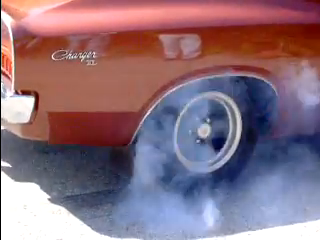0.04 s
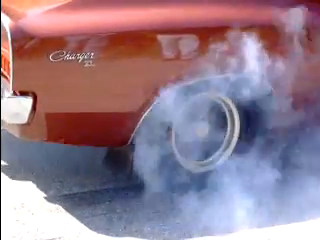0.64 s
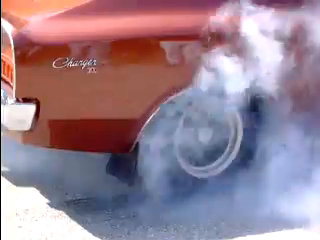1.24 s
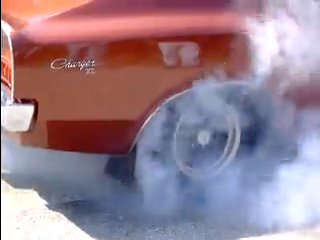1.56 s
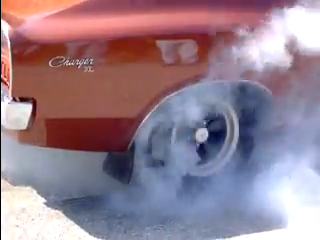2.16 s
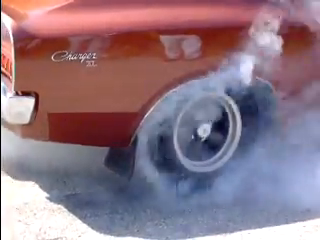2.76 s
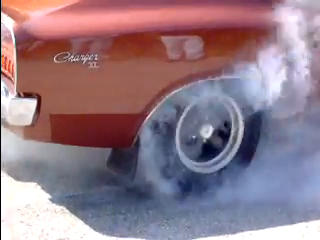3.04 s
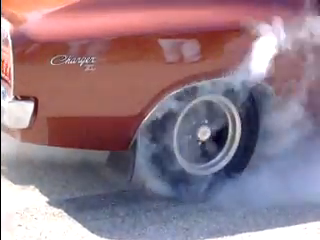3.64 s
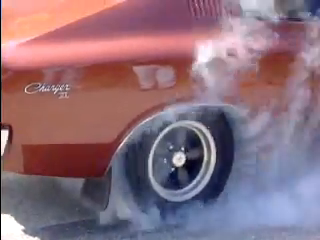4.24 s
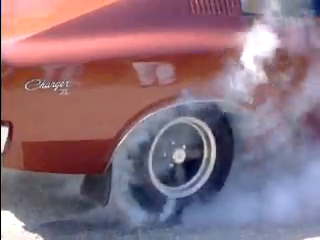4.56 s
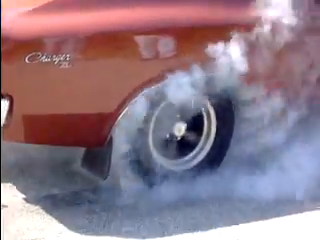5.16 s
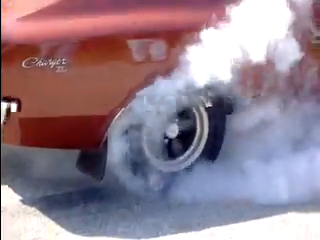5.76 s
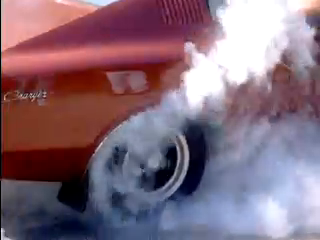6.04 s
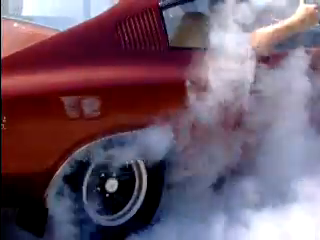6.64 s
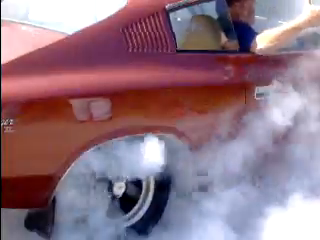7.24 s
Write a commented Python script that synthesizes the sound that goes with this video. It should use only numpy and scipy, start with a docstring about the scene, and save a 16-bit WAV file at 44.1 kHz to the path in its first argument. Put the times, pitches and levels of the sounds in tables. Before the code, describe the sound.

A car engine drones at high revs while a spinning rear tyre squeals, then howls and hisses on asphalt, close and slightly distorted.

```python
"""A six-cylinder car in a standing burnout on asphalt, the microphone beside the spinning rear wheel.
The exhaust drones and rasps at about 3200 rpm. The tyre squeals as it bites in the first second,
and howls and hisses as it slides. A few puffs of wind reach the microphone; late on it moves forward
and picks up the hiss ringing in the wheel arch. This close, the squeal overloads the small,
narrow-band recorder, which breaks into crackle."""
import sys
import numpy as np
from scipy import signal
from scipy.fft import rfft, irfft
from scipy.io import wavfile

SR = 44100
rng = np.random.default_rng(int(sys.argv[2]) if len(sys.argv) > 2 else 0)


def wrap_up_sound(samples):
    """Save the sound to the file named by the first command line argument, as 16-bit audio."""
    columns = np.atleast_2d(samples).T
    # keep every value between -1 and 1, then stretch to whole-number steps
    tamed = np.clip(columns, -1, 1)
    steps = np.round(tamed * 32767).astype(np.int16)
    wavfile.write(sys.argv[1], SR, steps)


N = 322371

# Engine speed. Each row: time in seconds, firings per second.
FIRING_RATE = [(0.0, 166.3), (0.16, 160.9), (0.38, 149.7), (0.9, 146.0), (1.16, 163.1), (1.26, 166.6),
               (1.65, 178.9), (1.9, 171.5), (2.33, 165.0), (2.6, 163.8), (2.9, 159.9), (3.6, 157.9),
               (4.2, 158.3), (5.36, 161.0), (5.56, 161.2), (6.2, 162.9), (7.31, 161.3)]
# Exhaust standing waves, which the firing harmonics glide through. Each row: frequency in Hz, level in dB.
STANDING_WAVES = [(146, -13), (157, -11.5), (165, -14), (178, -17.5), (292, -33.5), (320, -29), (337, -36),
                  (356, -23), (440, -37), (476, -24), (495, -27.5), (521, -34), (535, -28), (592, -29),
                  (615, -38), (690, -33)]
# Lope of uneven cylinders. Each row: multiple of the four-stroke cycle rate, relative level in dB.
LOPE_TONES = [(2, -20.5), (3, -20), (4, -16), (5, -2), (7, -20.5), (8, -20), (9, 0), (10, -15), (11, -17),
              (13, -11.5), (15, -18.5)]
# Cylinders in firing order. Each row: relative strength in dB, delay in seconds from unequal manifold runs.
CYLINDER_PULSES = [(-1, -.0009), (3.5, .00066), (-1.5, .00061), (-2, -.00046), (1.3, .00064),
                   (-2.2, -.00053)]
# Exhaust pipe resonances. Each row: frequency in Hz, width in Hz, relative level in dB.
PIPE_MODES = [(585, 60, -3), (733.3, 45, -0.5), (819.5, 43, 1), (1105, 230, -20), (1306, 120, -21)]
# Centre of the tyre's howl, sinking as the rubber heats. Each row: time in seconds, pitch in Hz.
HOWL_CENTRE = [(0.0, 915.2), (0.84, 903.1), (1.02, 819.2), (1.42, 830.8), (1.84, 790.4), (3.08, 807.3),
               (4.12, 753.5), (5.62, 779.6), (7.31, 807.9)]
# The tread catches and the howl surges. Each row: time in seconds, rise in dB.
HOWL_SURGES = [(.49, 3), (1.81, 3), (1.96, 4.5), (2.14, 3.5), (2.47, 4), (2.68, 5)]
# Rubber and road noise. Each row: frequency in Hz, relative spectral level in dB.
HISS_SPECTRUM = [(400, -3.5), (600, 7), (900, 13.5), (1400, 7.5), (2000, 1.5), (2700, -1), (4000, -9),
                 (5200, -15), (6800, -15.5)]
# Low rumble of the exhaust flow. Each row: frequency in Hz, relative spectral level in dB.
RUMBLE_SPECTRUM = [(22, -4.5), (55, -3), (90, -2), (140, 2), (250, -2), (340, 4), (420, -12), (600, 0)]
# Stick-slip squeals. Each row: start in seconds, length in seconds, pitch in Hz, level in dB.
TYRE_SQUEALS = [(0.059, 0.014, 970, -14), (.143, .088, 911.3, -2.8), (.252, .136, 906, -3.3),
                (.725, .055, 920, -18)]
# Lone sharp snaps. Each row: time in seconds, height in dB.
SNAPS = [(1.116, -4), (1.153, -3.5), (1.3344, -3.5), (1.6338, -4), (4.0605, -2.5), (4.4898, -4)]
# Wind on the microphone. Each row: time of the peak in seconds, half-length in seconds, level in dB.
WIND_PUFFS = [(2.779, .1, -36), (3.1, 0.029, -30.5), (3.2, 0.027, -30.5), (4.278, .03, -42),
              (4.62, .12, -48.5)]
# The drone from further forward. Each entry: change in dB of one of the first four firing harmonics.
MOVED_HARMONIC_DB = [-0.1, 4.2, -4, 0]

TUNED_HZ = 160.6   # firing rate at which the exhaust sounds fullest
# Levels that follow the revs. Each holds: dB at the tuned rate, dB gained per Hz above it,
# dB gained per Hz below it, dB lost once the microphone has moved.
HOWL_LEVEL = (-21.5, .25, -.04, 3)
HISS_LEVEL = (-27, .22, .06, .9)
RUMBLE_LEVEL = (-32.7, .14, .2, 3)
MOVE_START_S, MOVE_LENGTH_S = 5.23, 1   # the microphone moves forward along the car


def from_db(db):
    """Decibels to gain."""
    return 10 ** (np.asarray(db) / 20)


def rms_one(x):
    """Scale to unit rms."""
    return x / np.sqrt(np.mean(x ** 2) + 1e-20)


def in_time(rows):
    """A curve of (seconds, value) points at every sample."""
    return np.interp(np.arange(N) / SR, *np.transpose(rows))


def drift(rate):
    """Smooth random wander of spread 1."""
    r = np.exp(-80 * np.pi * rate / SR)
    slow = signal.lfilter([1], [1, -2 * r, r * r], rng.standard_normal(N // 40 + 2002))[2000:]
    return np.interp(np.arange(N) / 40, np.arange(len(slow)), rms_one(slow))


def band(x, low_hz, high_hz):
    """Butterworth band-pass."""
    return signal.sosfilt(signal.butter(2, [low_hz, high_hz], "band", fs=SR, output="sos"), x)


def resonance(x, hz, width_hz):
    """Two-pole resonance with gain 1 on top."""
    r = np.exp(-np.pi * width_hz / SR)
    feedback = [1, -2 * r * np.cos(2 * np.pi * hz / SR), r * r]
    return signal.lfilter(np.array([1, 0, -1]) * (1 - r * r) / 2, feedback, x)


def coloured_noise(spectrum):
    """Unit-rms noise with the given spectrum, falling away beyond its ends."""
    hz = np.maximum(np.arange(N // 2 + 1) * SR / N, 1)
    points_hz, points_db = np.transpose(spectrum)
    skirts = np.minimum(hz / points_hz[0], 1) ** 2 * np.minimum(points_hz[-1] / hz, 1) ** 2
    gain = skirts * from_db(np.interp(np.log(hz), np.log(points_hz), points_db))
    return rms_one(irfft(rfft(rng.standard_normal(N)) * gain, N))


def turning(hz):
    """Running angle of something that repeats hz times a second."""
    return 2 * np.pi * np.cumsum(hz) / SR


def tone(angle):
    """Unit-rms sine with a random starting phase."""
    return np.sqrt(2) * np.sin(angle + rng.uniform(0, 2 * np.pi))


def hump(s, half_length_s):
    """Smooth swell of height 1 around a moment."""
    return np.exp(-((np.arange(N) / SR - s) / half_length_s) ** 2)


def mic_moved():
    """How far the microphone has moved forward, 0 to 1."""
    return np.clip((np.arange(N) / SR - MOVE_START_S) / MOVE_LENGTH_S, 0, 1)


def with_revs(firing_hz, law):
    """Level in dB that changes as the engine races or bogs, and drops as the microphone moves on."""
    db, racing, bogging, moved_db = law
    above_hz = firing_hz - TUNED_HZ
    return db + np.where(above_hz > 0, racing, bogging) * np.abs(above_hz) - moved_db * mic_moved()


def exhaust_drone(firing, firing_hz, waver_db, lope_db, loss_db_per_hz):
    """Clean low firing harmonics; unequal cylinders add lope tones, strongest at the tuned rate."""
    harmonics = 0
    for k, moved_db in enumerate(MOVED_HARMONIC_DB, 1):
        level_db = np.interp(k * firing_hz, *np.transpose(STANDING_WAVES)) + moved_db * mic_moved()
        harmonics += from_db(level_db + waver_db * k * drift(12)) * tone(k * firing)
    cycle = firing / len(CYLINDER_PULSES)
    lope = sum(from_db(db + 1.1 * drift(8)) * tone(k * cycle) for k, db in LOPE_TONES)
    return harmonics + from_db(lope_db - loss_db_per_hz * np.abs(firing_hz - TUNED_HZ)) * lope


def pipe_rasp(firing, firing_hz, level_db, loss_db_per_hz, scatter_db, jitter_s):
    """Each firing sends a sharp pulse down the pipe and sets it ringing, loudest at the tuned rate."""
    fired_at = np.flatnonzero(np.diff(firing // (2 * np.pi)))
    strength_db, delay_s = np.resize(CYLINDER_PULSES, (len(fired_at), 2)).T
    jitter, scatter = rng.standard_normal((len(fired_at), 2)).T
    late = np.round((delay_s + jitter_s * jitter) * SR).astype(int)
    pulses = np.zeros(N)
    pulses[np.clip(fired_at + late, 0, N - 1)] = from_db(strength_db + scatter_db * scatter)
    pipe = sum((-1) ** k * from_db(db) * resonance(pulses, hz, width)
               for k, (hz, width, db) in enumerate(PIPE_MODES))
    gain = from_db(level_db - loss_db_per_hz * np.abs(firing_hz - TUNED_HZ))
    return gain * rms_one(band(pipe, 480, 1800))


def tyre_howl(firing, firing_hz, width_hz, swing_hz, firings_per_turn):
    """Hot tread slips in a ragged howl whose pitch swings with each turn of the wheel."""
    wheel = firing / firings_per_turn
    slip = turning(in_time(HOWL_CENTRE) + swing_hz * np.sin(wheel))
    # many tread blocks slip out of step, so strength and phase wander
    howl = rms_one(drift(width_hz) * np.cos(slip) + drift(width_hz) * np.sin(slip))
    surge_db = sum(db * hump(s, half_length_s=.04) for s, db in HOWL_SURGES)
    return howl * from_db(with_revs(firing_hz, HOWL_LEVEL) + surge_db)


def engine_chuff(firing):
    """Swing in dB of the hiss: it pulses with each firing and each engine cycle, and flutters."""
    return 1.08 * np.cos(firing) + .71 * np.cos(firing / len(CYLINDER_PULSES)) + .6 * drift(90)


def tyre_hiss(firing_hz, chuff_db):
    """Rubber scrubs over asphalt next to the microphone, pulsing with the engine."""
    return coloured_noise(HISS_SPECTRUM) * from_db(with_revs(firing_hz, HISS_LEVEL) + chuff_db)


def exhaust_rumble(firing_hz):
    """Turbulent exhaust flow, louder on either side of the tuned rate."""
    return coloured_noise(RUMBLE_SPECTRUM) * from_db(with_revs(firing_hz, RUMBLE_LEVEL))


def tyre_squeal(attack_s, release_s, sag_hz, wobble_hz, flutter_db):
    """Where the rubber grips, the whole tread sticks and slips in step; firmer grip lowers the pitch."""
    t, out = np.arange(N) / SR, 0
    for start, length, hz, db in TYRE_SQUEALS:
        before_s, after_s = np.maximum(start - t, 0), np.maximum(t - start - length, 0)
        grip = np.exp(-before_s / attack_s - after_s / release_s)
        pitch_hz = hz + sag_hz * (1 - grip) + wobble_hz * drift(60)
        out += grip * from_db(db + flutter_db * drift(70)) * tone(turning(pitch_hz))
    return out


def overload(x, limit, chance, burst_s, kept, crackle, ceiling):
    """The recorder flattens peaks; some crests that pass the limit break into a brief crackle."""
    crests = np.diff((np.abs(x) > limit) * 1., prepend=0) > 0
    breaks = crests & (rng.random(N) < chance)
    broken = signal.lfilter(np.ones(round(burst_s * SR)), [1], breaks * 1.) > 0
    noise = coloured_noise([(30, 9.5), (600, -3.5), (1600, 2.5), (3000, 2.5), (5000, -8.5), (6800, -3)])
    x = np.where(broken, kept * x + crackle * noise, x)
    return x / (1 + (x / ceiling) ** 8) ** (1 / 8)


def snaps(x, width_s, ring_hz, ring_s, ring_db):
    """At each snap the signal drops out for a millisecond and makes one steep, ringing jump."""
    out, t = x.copy(), np.arange(N) / SR
    for s, db in SNAPS:
        near = np.abs(t - s) < .005
        since = t[near] - s
        edge = np.sign(since) * np.exp(-np.abs(since) / width_s)
        ring = np.sin(2 * np.pi * ring_hz * since) * np.exp(-np.abs(since) / ring_s)
        out[:, near] *= 1 - np.exp(-(since / (2 * ring_s)) ** 2)
        out[:, near] += from_db(db) * (edge + from_db(ring_db) * ring)
    return out


def wind_on_mic():
    """Puffs of wind strike the microphone as short, deep thumps."""
    gusts = sum(from_db(db) * hump(s, half_length) for s, half_length, db in WIND_PUFFS)
    return gusts * rms_one(band(rng.standard_normal(N), 25, 75))


def wheel_arch(chuff_db, hz, width_hz, level_db):
    """The hiss rings in the wheel arch, heard as the microphone moves forward."""
    ringing = resonance(coloured_noise(HISS_SPECTRUM), hz, width_hz)
    ringing = resonance(ringing, hz, width_hz)   # twice, for steeper skirts
    return mic_moved() * from_db(level_db + chuff_db) * rms_one(ringing)


def scene():
    """The car at one close microphone; engine and tyre share a shaft speed that trembles slightly."""
    firing_hz = in_time(FIRING_RATE)
    firing = turning(firing_hz * (1 + .00045 * drift(14)))   # angle: one turn per firing
    engine = exhaust_drone(firing, firing_hz, waver_db=.06, lope_db=-28.3, loss_db_per_hz=.85)
    engine += pipe_rasp(firing, firing_hz, level_db=-21.7, loss_db_per_hz=.42,
                        scatter_db=1.8, jitter_s=.00006)
    tyre = tyre_howl(firing, firing_hz, width_hz=90, swing_hz=8, firings_per_turn=30.5)
    chuff_db = engine_chuff(firing)
    tyre += tyre_hiss(firing_hz, chuff_db)
    tyre += wheel_arch(chuff_db, hz=1010, width_hz=180, level_db=-32.5)
    tyre += tyre_squeal(attack_s=.009, release_s=.012, sag_hz=21.99, wobble_hz=11, flutter_db=1.3)
    return (engine + tyre + exhaust_rumble(firing_hz) + wind_on_mic())[None]


def record(dry):
    """The small recorder: overload, lone snaps, a band ending at 6950 Hz, a hard clip and a top cut."""
    loud = overload(dry, limit=1.05, chance=.39, burst_s=.0009, kept=.33, crackle=.48, ceiling=.71)
    loud = snaps(loud, width_s=.00016, ring_hz=2570, ring_s=.00027, ring_db=-8)
    narrow = signal.sosfilt(signal.ellip(10, .3, 80, 6950, fs=SR, output="sos"), loud)
    clipped = np.clip(narrow, -.73, .73)
    return signal.sosfilt(signal.cheby2(12, 70, 16400, fs=SR, output="sos"), clipped)


dry = scene()
out = record(dry)
wrap_up_sound(out)
```